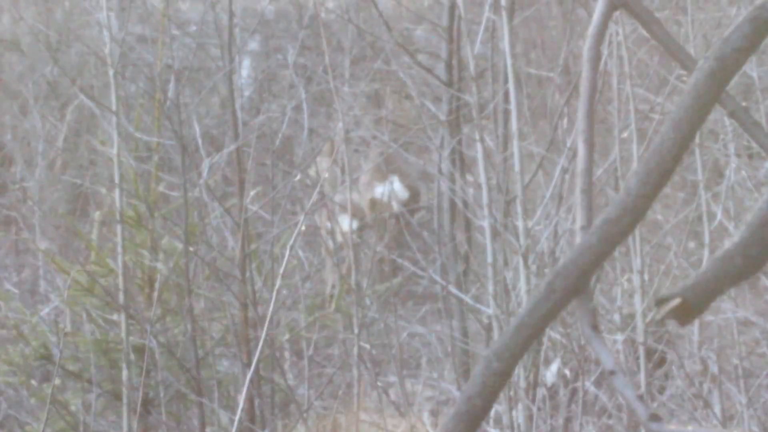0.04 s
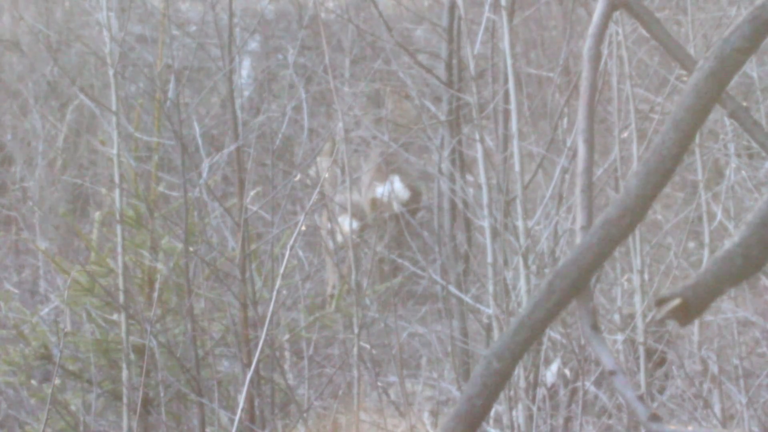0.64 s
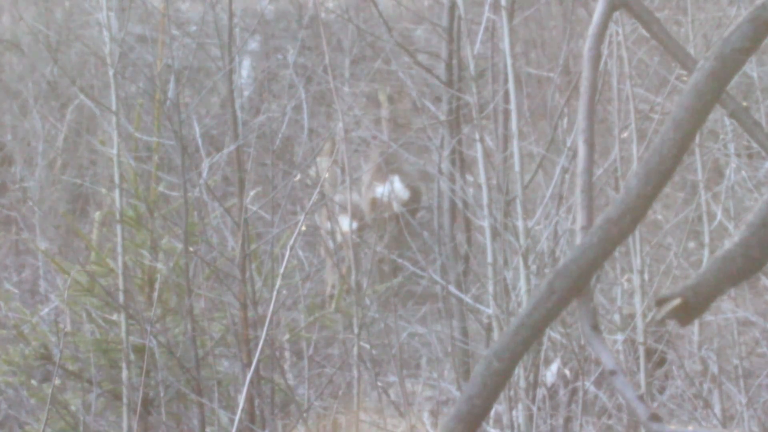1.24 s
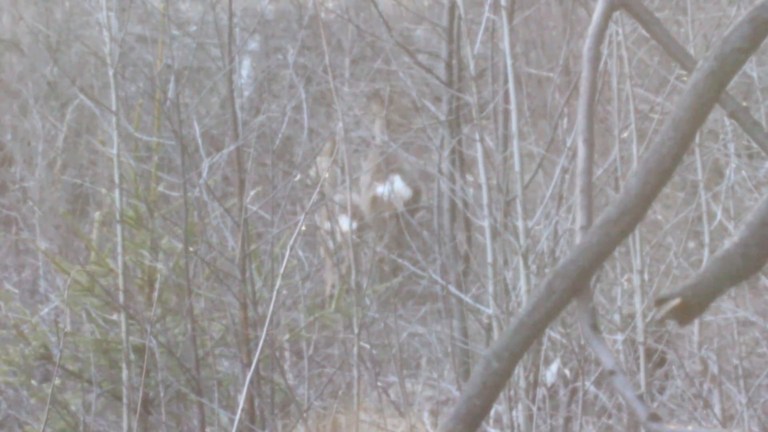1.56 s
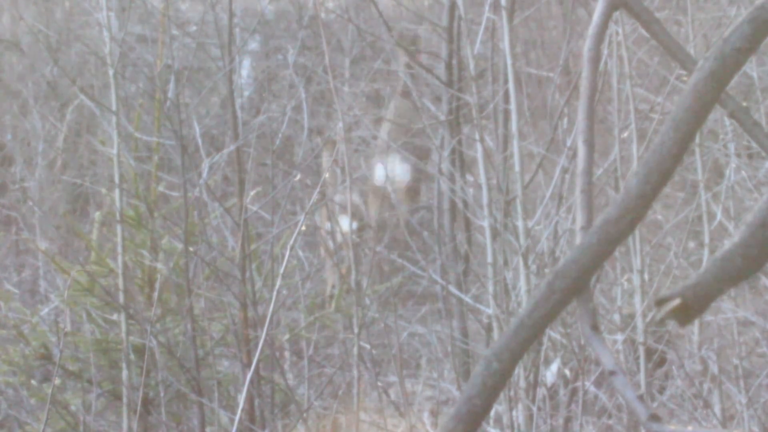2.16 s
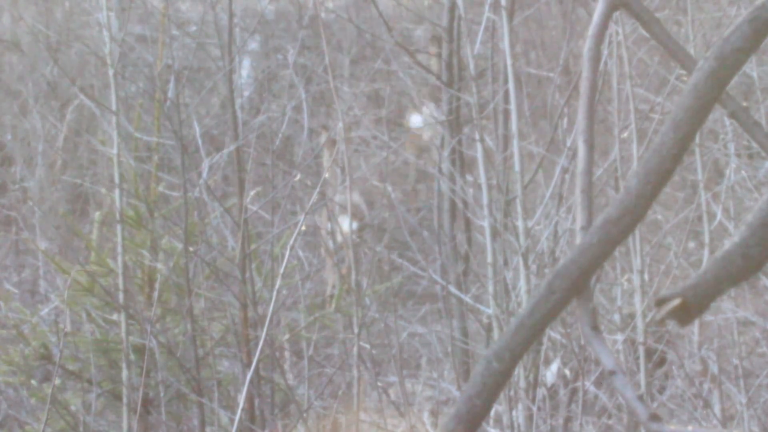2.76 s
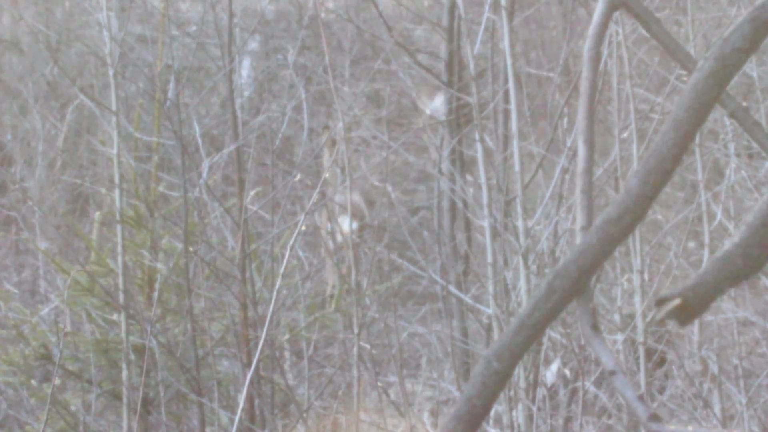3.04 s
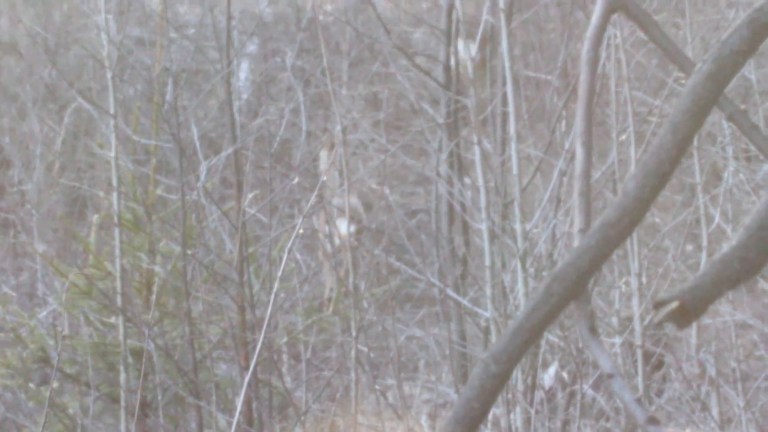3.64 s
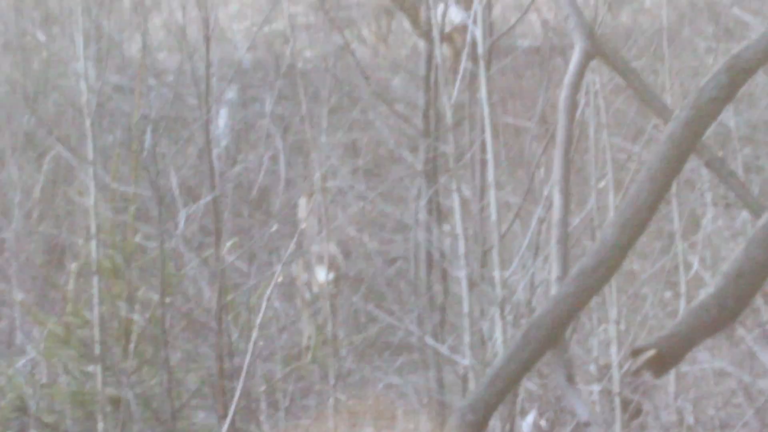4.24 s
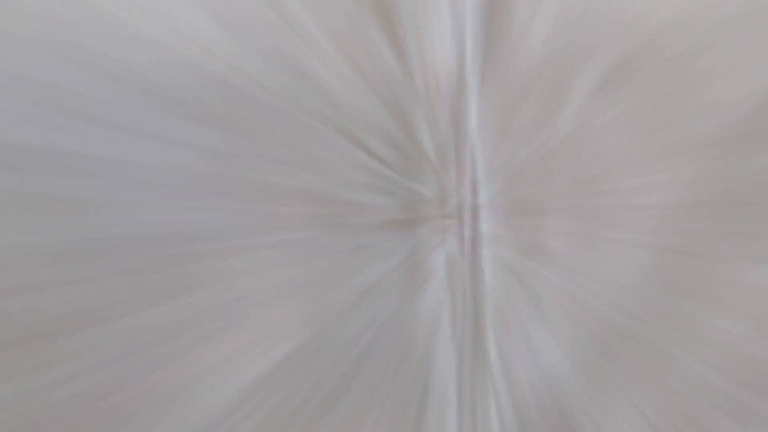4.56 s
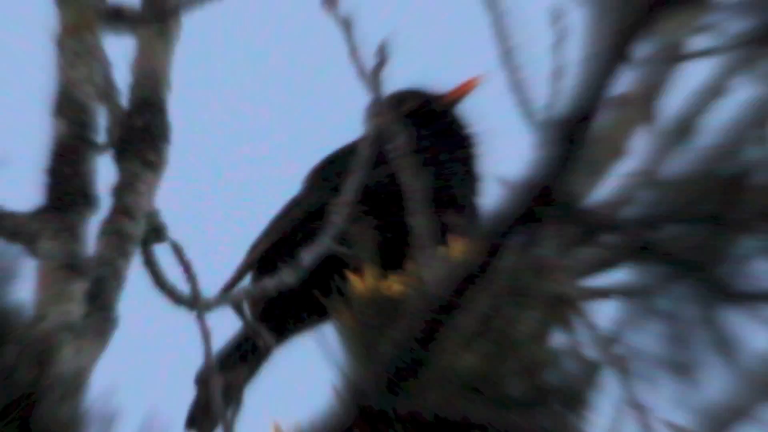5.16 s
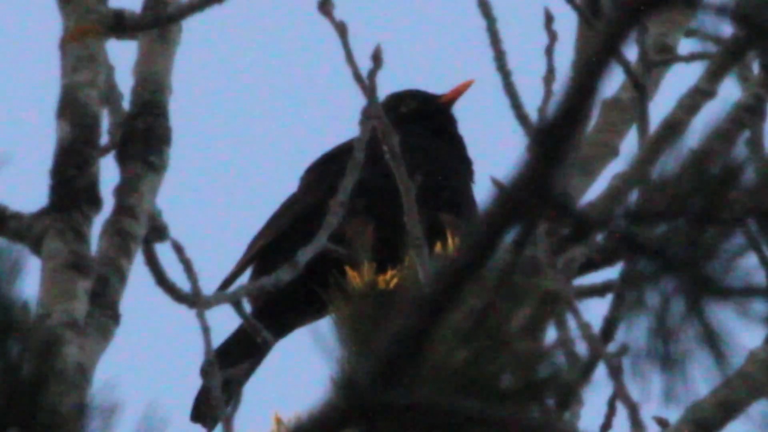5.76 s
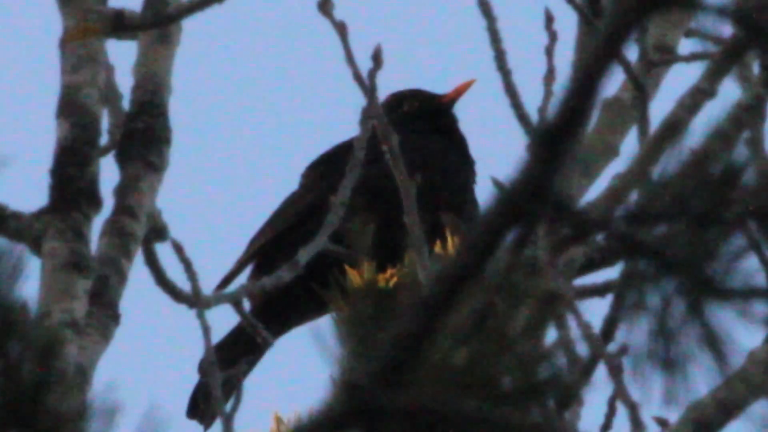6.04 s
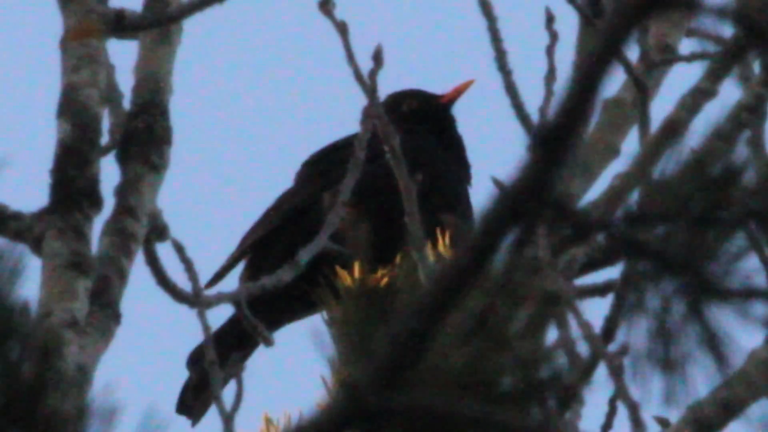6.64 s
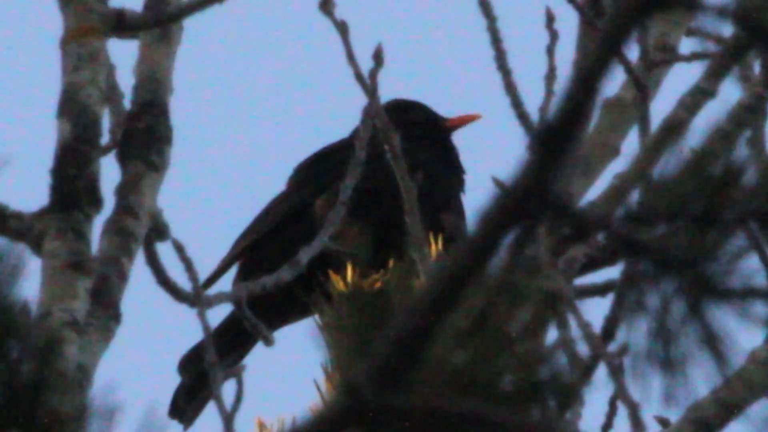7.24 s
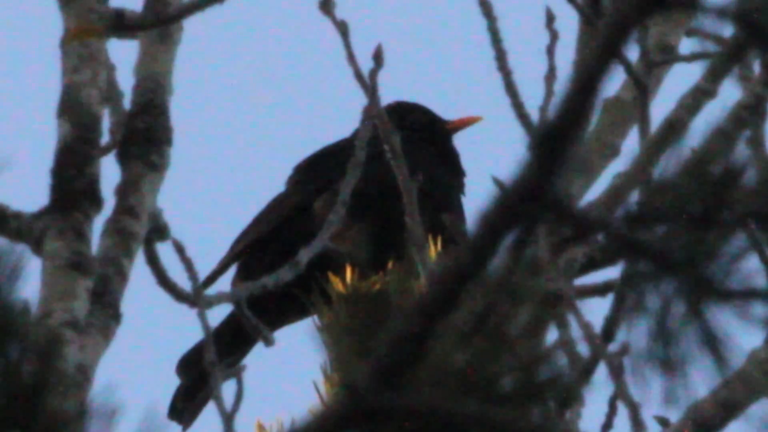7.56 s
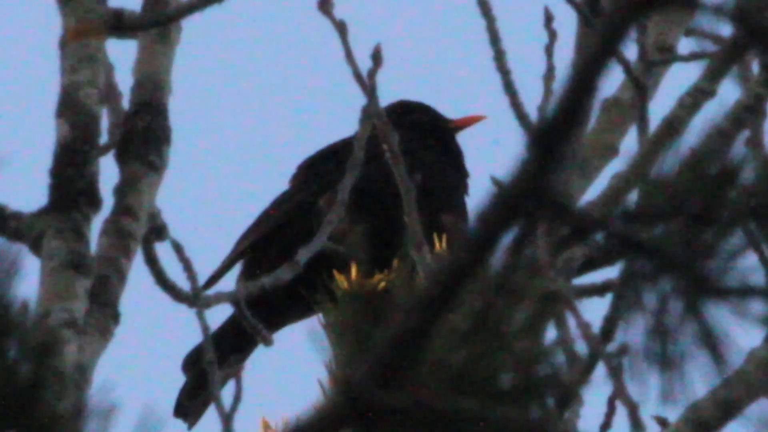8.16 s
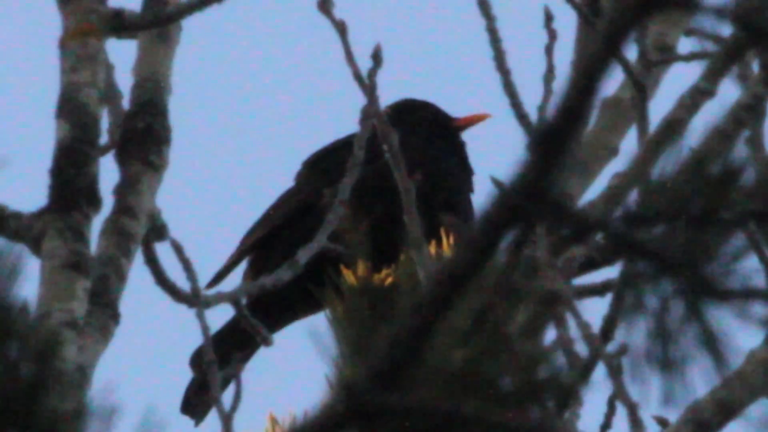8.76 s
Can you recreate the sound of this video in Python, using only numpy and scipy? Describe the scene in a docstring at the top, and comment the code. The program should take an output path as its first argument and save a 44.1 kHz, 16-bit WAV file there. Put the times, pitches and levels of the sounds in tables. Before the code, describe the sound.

Low wind rumbles on the microphone in a quiet wood. A deer gives one long, hoarse bark, then a run of short, rough barks as it bounds away through dry leaves and snapping twigs, each echoing off the trees. As the barks fade, the wind drops and a blackbird whistles one short phrase. A soft hush and a few faint twig ticks remain.

```python
"""Wind rumbles on the microphone in a winter wood, and a far bird gives one faint note.
A roe deer pushes air through its vocal folds and throat in one long, hoarse bark,
then gives short barks as it bounds off through dry leaves and snapping twigs.
During its last barks the wood fades into a quieter evening place, where a blackbird
whistles one phrase from a treetop and the trees throw it back."""
import sys
import numpy as np
from scipy import signal
from scipy.fft import rfft, irfft, next_fast_len
from scipy.io import wavfile
from scipy.ndimage import uniform_filter1d, map_coordinates

SR = 44100
rng = np.random.default_rng(int(sys.argv[2]) if len(sys.argv) > 2 else 0)


def inscribe(sig):
    """Save sig as 16-bit PCM at rate SR to the path in sys.argv[1].

    A 1-D sig is mono; a 2-D sig holds one channel per row.
    Samples are clipped to [-1, 1] before scaling.
    """
    pcm = np.round(np.clip(np.atleast_2d(sig).T, -1, 1) * 32767)
    wavfile.write(sys.argv[1], SR, pcm.astype(np.int16))


N = 392049
T = np.arange(N) / SR

# The tone of the deer's throat, stretched for a long bark: frequency_hz, level_db
STRETCHED_THROAT = [(120, -22), (400, -27.5), (520, -12.5), (700, 8), (830, -0.5), (1100, 3), (1280, 0.5),
                    (1410, -18), (1670, -31), (2130, -8.5), (2400, -20), (3000, -21.5), (4100, -41.5),
                    (7500, -61)]
# The tone of dry twigs and leaves: frequency_hz, level_db
CRACKLE_TONE = [(800, -26), (2000, 7.5), (3300, 5), (5000, 5), (6500, -14), (10000, -11), (15000, -22)]


def amp(db):
    """Turns decibels into a number to multiply by."""
    return 10 ** (np.asarray(db) / 20)


def unit(x):
    """Scales a sound to an average strength (rms) of 1."""
    return x / np.sqrt(np.mean(x ** 2) + 1e-20)


def gain_at(tone, hz):
    """How strongly a tone table lets each frequency through."""
    table_hz, db = np.transpose(tone)
    return amp(np.interp(np.log(hz + 1), np.log(table_hz + 1), db))


def follow(rows, t):
    """Reads a table at the times t, gliding from row to row."""
    time_s, *columns = np.transpose(rows)
    return [np.interp(t, time_s, column) for column in columns]


def colour(x, tone):
    """Filters a sound with a tone table and scales it to strength 1."""
    size = x.shape[-1]
    padded = next_fast_len(size)
    spectrum = rfft(x, padded) * gain_at(tone, np.fft.rfftfreq(padded, 1 / SR))
    return unit(irfft(spectrum, padded)[..., :size])


def wander(size, hz):
    """A smooth random wobble, up to about hz times a second."""
    return map_coordinates(rng.standard_normal(1024), [np.arange(size) * 2 * hz / SR], order=2)


def add(mix, start_s, sound):
    """Mixes a sound in at its start time."""
    part = mix[round(start_s * SR):][:len(sound)]
    part += sound[:len(part)]


def hiss(db):
    """Microphone hiss, different on the left and right."""
    tone = [(30, -4.0), (200, 5.0), (600, 0.5), (2000, -0.5), (15000, 2.5)]  # frequency_hz, level_db
    return amp(db) * colour(rng.standard_normal((2, N)), tone)


def far_trees(tone, ripple, delay_s=0.0005045):
    """The rush of far trees; a flipped echo inside the microphone housing ripples its tone."""
    rush = colour(rng.standard_normal(N), tone) * amp(.5 * wander(N, 6.1))
    return unit(rush - ripple * np.interp(T - delay_s, T, rush))


def wind(buffet_db=-0.5, buffet_hz=4.1):
    """Wind on the microphone: a low rumble that swells slowly and wavers at random."""
    # The deep tone of the rumble: frequency_hz, level_db
    rumble_tone = [(12, -1.5), (28, 3.5), (45, 0.5), (70, -8), (95, -14.5), (125, -22.5), (170, -32.5),
                   (300, -41), (800, -72)]
    # The rise and fall of the wind: time_s, level_db
    gusts = [(0, -58.5), (.9, -51), (1.53, -43), (1.9, -45.5), (2.75, -48.5), (3.15, -40.5), (3.55, -46.5),
             (4.3, -42.5), (4.7, -50), (5.08, -57), (5.27, -74)]
    rumble = colour(rng.standard_normal(N), rumble_tone)
    return rumble * amp(follow(gusts, T)[0] + buffet_db * wander(N, buffet_hz))


def lingering_echo(db=-43, ring_s=1.2):
    """At the start, the wood still rings with an earlier bark."""
    return colour(rng.standard_normal(N), STRETCHED_THROAT) * amp(db - 60 * T / ring_s)


def with_tree_echoes(sound, echo_db, ring_s, first_s, tone, trunks_per_s=700):
    """Adds scattered echoes from the trunks, dying away by 60 dB in ring_s."""
    t = np.arange(SR) / SR
    echoes = np.sign(rng.standard_normal(SR)) * (rng.random(SR) < trunks_per_s / SR)
    echoes = echoes * amp(-60 * t / ring_s) * (t > first_s)
    echoes /= np.linalg.norm(echoes)
    tail = irfft(rfft(echoes) * gain_at(tone, np.fft.rfftfreq(SR, 1 / SR)))
    return sound + amp(echo_db) * signal.fftconvolve(sound, tail)[:N]


def leaves(grains_per_s=2500, rise_db_per_s=400, settle_db_per_s=47):
    """Dry leaves crackle each time the deer lands, then settle."""
    # The hooves landing: time_s, level_db
    landings = [(2.8, -52.5), (3.16, -55), (3.36, -58.5), (3.77, -55), (4.13, -53.5), (4.49, -58.5)]
    grains = rng.standard_normal(N) * (rng.random(N) < grains_per_s / SR)
    rustles_db = [db - np.maximum(rise_db_per_s * (time_s - T), settle_db_per_s * (T - time_s))
                  for time_s, db in landings]
    return colour(grains, CRACKLE_TONE) * amp(np.max(rustles_db, axis=0))


def twigs(gain_db=-5):
    """Dry wood cracks in short bursts; thinner twigs sound higher."""
    # Snaps under the hooves, later around the bird: start_s, relative_db, ring_s, pitch_factor
    snaps = [(2.192, -45, 0.4, 1.05), (2.768, -37.5, 0.077, 0.83), (2.782, -32, .055, 1.11),
             (2.937, -40.5, 0.13, 0.98), (2.958, -41.5, 0.13, 1.2), (3.025, -42, .05, 1.1),
             (3.354, -40, .084, 1.24), (3.61, -42, 0.046, 1), (3.636, -41, .03, 1),
             (3.66, -35.5, 0.033, 1.04), (3.75, -33, .029, 0.93), (3.824, -41, .04, 0.92),
             (6.749, -38, 0.03, 0.95), (7.315, -41, .033, .37), (8.169, -42, .036, .85),
             (8.375, -41, .034, 0.34), (8.635, -43, .027, 0.5)]
    out, t = np.zeros(N), np.arange(8192) / SR
    for start_s, db, ring_s, pitch_factor in snaps:
        tone = [(hz * pitch_factor, level) for hz, level in CRACKLE_TONE]
        crack = colour(rng.standard_normal(len(t)), tone)
        add(out, start_s, crack * amp(db + gain_db - 60 * t / ring_s))
    return out


def birds(edge_db=-9, flutter_db_per_hz=0.0265):
    """Nearly pure whistles that swoop onto a pitch and slide off; trills shake pitch and loudness."""
    # A far bird's note, then the blackbird, whose two-sided voice box can overlap notes:
    # start_s, length_s, level_db, loudest_at (0-1), first_hz, held_hz, last_hz, trill_hz, depth_hz
    notes = [(.79, .19, -66, 0.37, 2080, 1955, 1900, 2, 0),
             (4.557, 0.099, -45.5, 0.87, 2090, 2206, 2460, 47, 36),
             (4.663, 0.098, -43.5, 0.93, 2750, 2725, 2633, 56.5, 97),
             (4.74, .056, -34, 0.53, 2705, 2562, 2540, 3, 3),
             (4.862, 0.18, -31, 0.53, 2220, 2254, 1728, 7, 1.5),
             (5.042, 0.033, -35.5, .42, 2130, 2457, 2600, 162, 208),
             (5.412, 0.067, -44, 0.66, 2310, 2350, 2380, 58, 140),
             (5.498, 0.085, -40, 1, 1300, 1492, 1433, 0, 3),
             (5.715, .106, -32.5, 0.63, 1934, 4474, 4150, 162, 51),
             (5.78, 0.027, -52, 0.61, 1930, 2024, 1870, 0, 0),
             (5.781, 0.023, -42.5, .5, 1900, 4200, 1700, 0, 0),
             (5.832, 0.095, -30.5, 0.44, 3670, 3262, 3204, 2, 0)]
    # The pure tones in a whistle: pitch_multiple, level_db
    harmonics = [(1, 0), (2, -38), (3, -36)]
    out = np.zeros(N)
    for start_s, length_s, db, loudest_at, first_hz, held_hz, last_hz, trill_hz, depth_hz in notes:
        t = np.arange(0, length_s, 1 / SR)
        progress = t / length_s
        swoop_hz = (first_hz - held_hz) * (1 - progress) ** 7.7
        hz = held_hz + swoop_hz + (last_hz - held_hz) * progress ** 4
        swing_hz = (depth_hz + 0.21 * abs(swoop_hz)) * (trill_hz > 0)
        trill = np.clip(np.sin(2 * np.pi * trill_hz * t) + 0.7 * wander(len(t), 339), -1, 1)
        waver = 1 + .002 * wander(len(t), 80)
        cycles = np.cumsum(hz * waver + swing_hz * trill) / SR
        # the beak lets out no overtones of the highest notes
        whistle = sum(amp(part_db) * np.sin(2 * np.pi * k * cycles)
                      * np.clip((7800 - k * hz) / 1500, 0, 1) for k, part_db in harmonics)
        swell_db = edge_db * np.interp(progress, [0, loudest_at, 1], [1, 0, 1]) ** 2
        flutter_db = flutter_db_per_hz * np.minimum(swing_hz, 150) * trill
        loudness = amp(db + swell_db - flutter_db) * signal.windows.tukey(len(t), .13)
        add(out, start_s, unit(whistle) * loudness)
    return out


def effort(t, rise_s, fall_s, edge_db, bend):
    """A bark builds up, holds and gives out; in dB compared with full effort."""
    slack = np.maximum(1 - (t - t[0]) / rise_s, 1 - (t[-1] - t) / fall_s)
    return edge_db * np.clip(slack, 0, 1) ** bend


def vocal_folds(cycles, roughness, rasp_db):
    """The deer's vocal folds buzz unevenly and let through puffs of air."""
    size = len(cycles)

    def buzz(multiples):
        """Many paths through the thicket put the tones of the buzz out of step."""
        return sum(np.cos(2 * np.pi * (k * cycles + 0.73 * rng.random()))
                   * amp(4.3 * wander(size, 14.54)) for k in multiples)

    harmonics = np.arange(1, 23)
    pulses = buzz(harmonics) + amp(-9) * buzz(harmonics + .5)  # strong and weak pulses take turns
    puffs = (0.41 + np.exp(-(cycles % 1) / .5)) * rng.standard_normal(N)[:size]
    source = np.sqrt(1 - roughness) * unit(pulses) + np.sqrt(roughness) * unit(puffs)
    return source * amp(rasp_db * wander(size, 69.2))


def bark(t, effort_db, pitch_hz, mouth, throat, roughness, bright_db,
         chest_db=-27, rasp_db=1.5, octave_gain=.85, brighten_db_per_s=0):
    """The buzz passes through a throat that rings higher as the mouth opens."""
    size, age_s = len(t), t - t[0]
    cycles = np.cumsum(pitch_hz * (1 + .025 * wander(size, 110.3))) / SR
    source = vocal_folds(cycles, roughness, rasp_db)
    # cut the sound into short slices, each with its own tone
    hz, slice_s, slices = signal.stft(source, SR, nperseg=512, noverlap=384)
    hz = hz[:, None]
    strain_db = np.interp(slice_s, age_s, effort_db - np.max(effort_db))
    slope_db = bright_db + brighten_db_per_s * slice_s + 0.045 * strain_db  # harder is brighter
    tilt = amp(slope_db * np.log2(1 + hz / 1000))
    patches = uniform_filter1d(rng.standard_normal((len(hz), len(hz))), size=2, axis=0)
    patches = unit(uniform_filter1d(patches, size=20, axis=1))[:, :len(slice_s)]
    flicker = amp(3.5 * patches * np.minimum(hz / 1800, 1))  # the higher tones come and go
    ringing = gain_at(throat, hz / np.interp(slice_s, age_s, mouth))
    voice = signal.istft(slices * tilt * flicker * ringing, SR, nperseg=512, noverlap=384)[1][:size]
    voice /= np.sqrt(uniform_filter1d(voice ** 2, size=700) + 1e-12)  # steady lungs hold the loudness
    # the two lowest tones leave through the chest
    chest = amp(chest_db) * (np.sin(2 * np.pi * cycles) + octave_gain * np.sin(4 * np.pi * cycles))
    return amp(effort_db) * (voice + chest) * signal.windows.tukey(size, .05)


def long_bark(start_s=1.925, length_s=0.38, db=-19.5):
    """The deer's opening bark rises and falls in pitch as its mouth opens and closes."""
    # The arch of the bark: time_s, pitch_hz, mouth_factor (scales the throat's frequencies)
    arch = [(1.93, 150, 0.85), (1.97, 166.3, 0.95), (2.03, 177.2, 0.99), (2.1, 183.5, 1.027),
            (2.16, 185.8, 0.97), (2.21, 169.9, 1.014), (2.25, 151.4, 0.87), (2.3, 128, 0.73)]
    out = np.zeros(N)
    t = start_s + np.arange(0, length_s, 1 / SR)
    effort_db = db + effort(t, rise_s=0.083, fall_s=0.11, edge_db=-35, bend=3.25)
    pitch_hz, mouth = follow(arch, t)
    add(out, start_s, bark(t, effort_db, pitch_hz, mouth, STRETCHED_THROAT, roughness=.56,
                           bright_db=-0.9, chest_db=-27.5, rasp_db=3.0, octave_gain=.4,
                           brighten_db_per_s=5.5))
    return out


def short_barks(pitch_sag=0.1377, tired_from_s=4):
    """The running deer gives short, hoarse barks, each sagging in pitch."""
    # One row a bark: start_s, length_s, level_db, pitch_hz, first_mouth_factor, last_mouth_factor,
    # roughness (0-1), brightness_db_per_octave
    barks = [(2.815, 0.15, -22, 158.3, 1.06, 0.97, 0.81, -0.5),
             (3.178, 0.19, -23.5, 151.1, 1.003, .97, 0.5, 0.2),
             (3.602, 0.18, -22, 152.1, 1.044, 0.91, 0.87, 1.4),
             (4.168, 0.15, -24, 151.2, 0.94, 1, 0.58, -2.5),
             (4.515, .19, -32, 145.9, 1.04, 0.82, 0.76, -3.5), (5.158, 0.15, -49, 160, 1.06, 0.73, 0.9, -1)]
    # The tone of the slack throat: frequency_hz, level_db
    slack_throat = [(110, -19.5), (200, -33), (285, -14), (380, -36), (570, -6.5), (730, 1), (860, -6),
                    (1040, 5.5), (1200, -12.5), (1480, -25), (1990, -18), (2200, -25), (2450, -30),
                    (2750, -34.5), (3500, -34), (5000, -71)]
    # The throat slackens further as the deer runs on: frequency_hz, level_db
    tired_throat = [(110, -10), (200, -21), (280, -13), (390, -48), (545, 1.5), (720, -0.5), (930, 3.5),
                    (1080, 5.5), (1270, -18), (1480, -20.5), (1880, -13.5), (2100, -20.5), (2480, -18),
                    (2850, -35), (6000, -58)]
    out = np.zeros(N)
    for start_s, length_s, db, hz, first_mouth, last_mouth, roughness, bright_db in barks:
        t = start_s + np.arange(0, length_s, 1 / SR)
        progress = np.linspace(0, 1, len(t))
        effort_db = db + effort(t, rise_s=.035, fall_s=0.37 * length_s, edge_db=-25, bend=1.4)
        pitch_hz = hz * (1 - pitch_sag * progress ** 2)
        mouth = first_mouth + (last_mouth - first_mouth) * progress
        throat = slack_throat if start_s < tired_from_s else tired_throat
        add(out, start_s, bark(t, effort_db, pitch_hz, mouth, throat, roughness, bright_db))
    return out


def scene(fade_s=(4.42, 5.37)):
    """The wood with the deer fades into the evening with the blackbird."""
    # The tone of the far trees in each place: frequency_hz, level_db
    wood_tone = [(30, -18), (150, -6), (250, -0.5), (400, 3), (600, -1.5), (1000, 1), (1250, -2),
                 (1650, -6), (2300, -9.5), (3000, -10.5), (4500, -13.5), (9000, -18.5), (15000, -22)]
    evening_tone = [(25, 0), (80, 3.5), (250, 0), (600, -2.5), (1100, 0.5), (1700, -5), (3000, -3.5),
                    (5000, -7.5), (7000, -10), (10000, -14.5), (15000, -20.5)]
    # The tone of each animal's echo: frequency_hz, level_db
    bark_echo = [(550, 5.0), (800, -3.5), (1180, 2.5), (1900, 6.5), (3000, 11.5)]
    song_echo = [(1400, -3), (2200, 2.5), (3300, -6.5), (4500, -7)]
    blend = np.interp(T, fade_s, [0, 1])
    rumble = wind() * np.minimum(1, 10 * (1 - blend))
    wood = amp(-50.5) * far_trees(wood_tone, ripple=0.23) + hiss(-54.5) + lingering_echo()
    evening = amp(-54.0) * far_trees(evening_tone, ripple=0.47) + hiss(-53.0)
    deer = long_bark() + short_barks()
    barks = with_tree_echoes(deer, echo_db=-21.0, ring_s=1.1, first_s=0.006, tone=bark_echo)
    song = with_tree_echoes(birds(), echo_db=-10, ring_s=0.89, first_s=0.024, tone=song_echo)
    return (1 - blend) * wood + blend * evening + rumble + leaves() + twigs() + song + barks


def record(dry, cutoff_hz=15800):
    """Cuts away the very highest treble."""
    low_pass = signal.firwin(511, cutoff_hz, window=("kaiser", 9), fs=SR)
    return signal.oaconvolve(dry, low_pass[None], "same")


dry = scene()
out = record(dry)
inscribe(out)
```